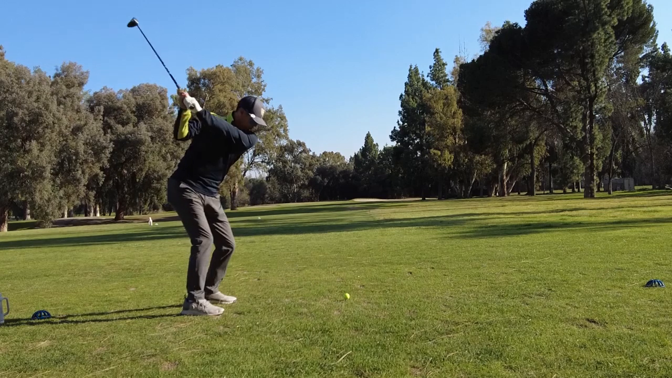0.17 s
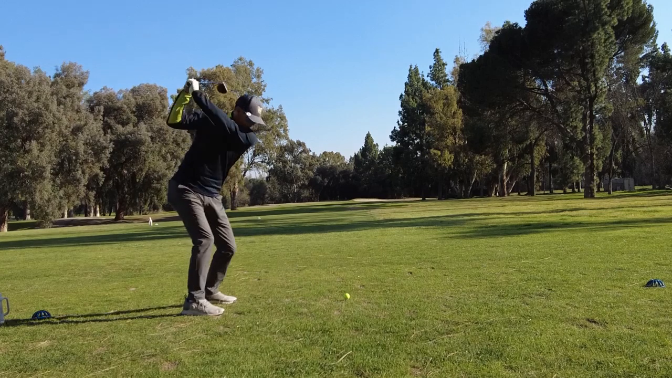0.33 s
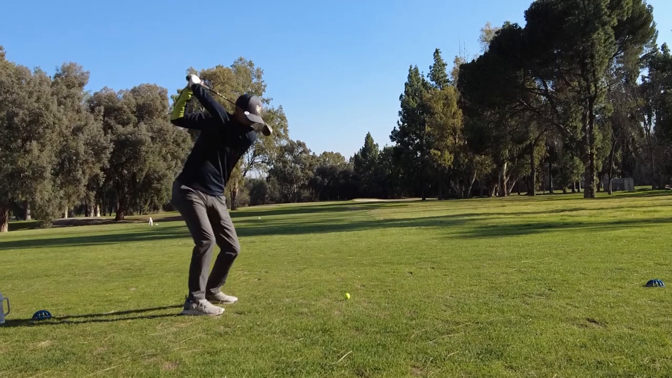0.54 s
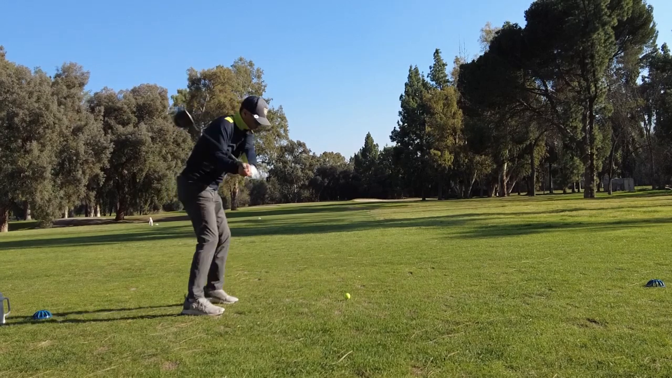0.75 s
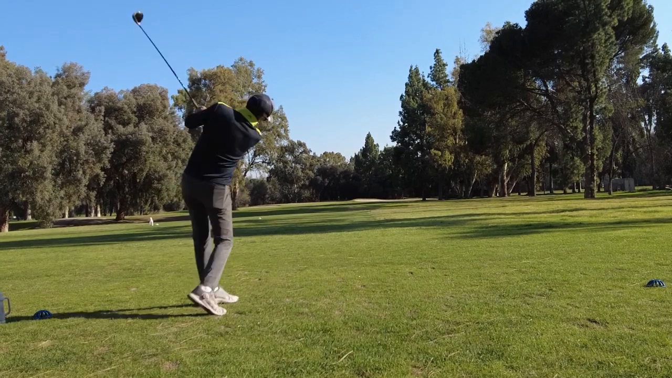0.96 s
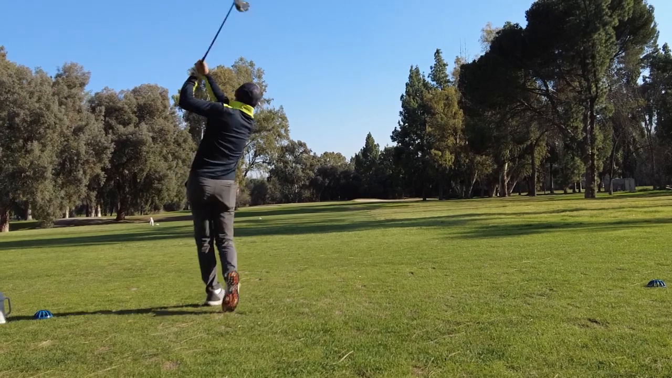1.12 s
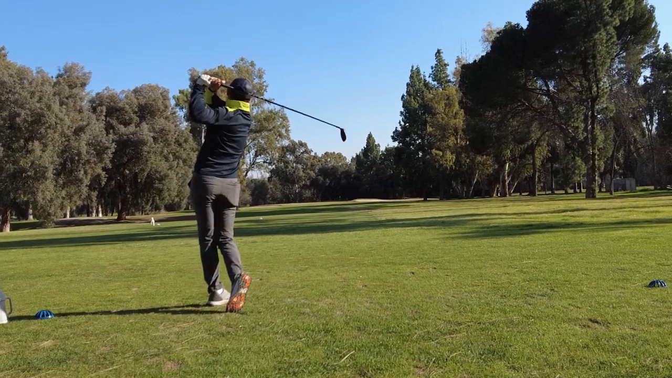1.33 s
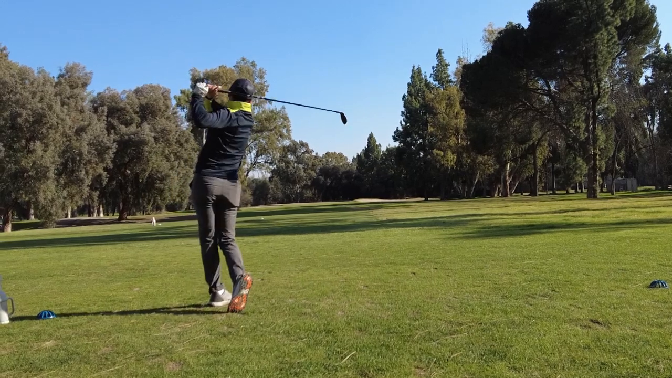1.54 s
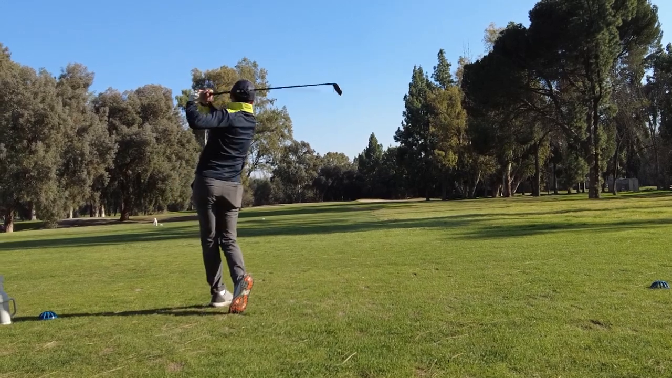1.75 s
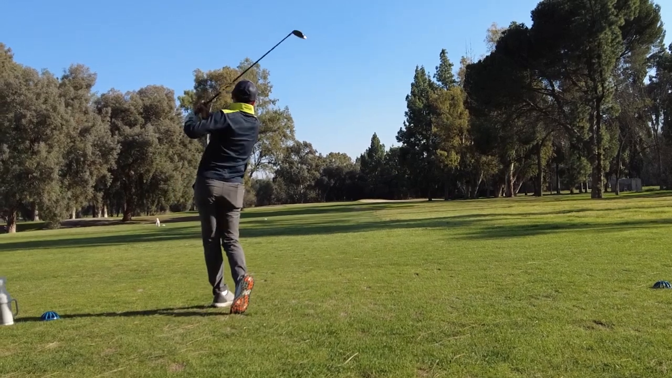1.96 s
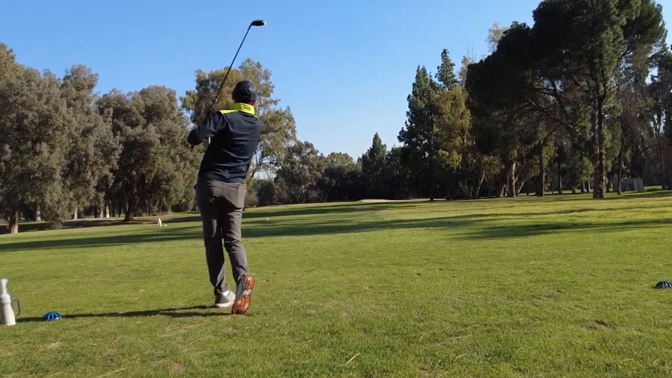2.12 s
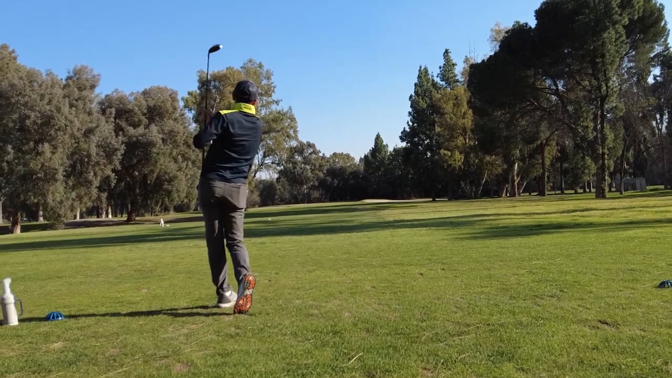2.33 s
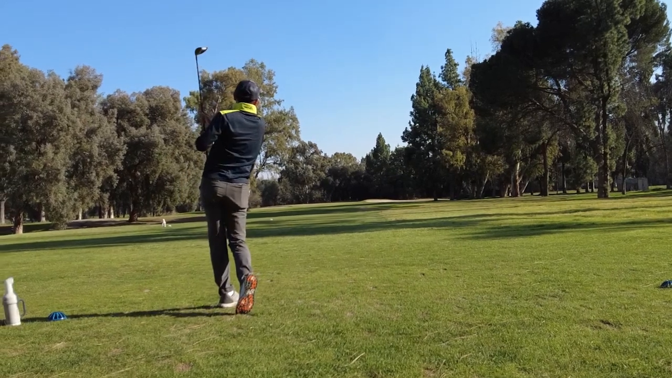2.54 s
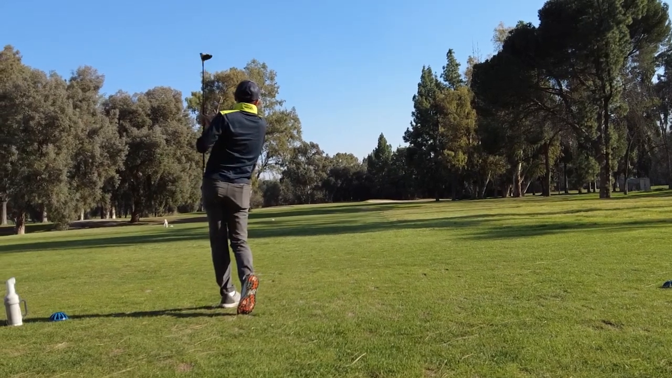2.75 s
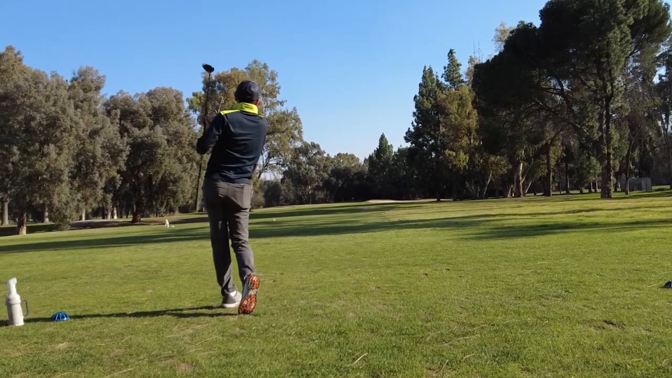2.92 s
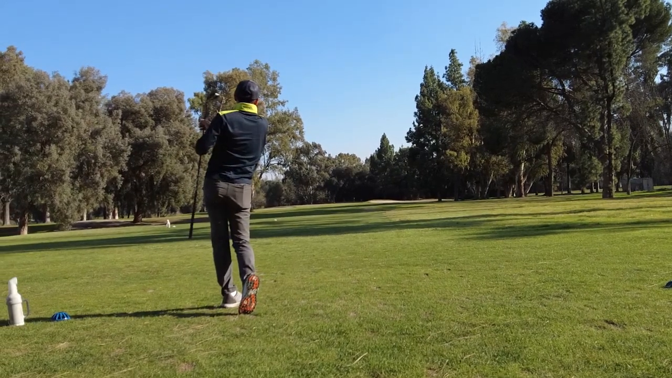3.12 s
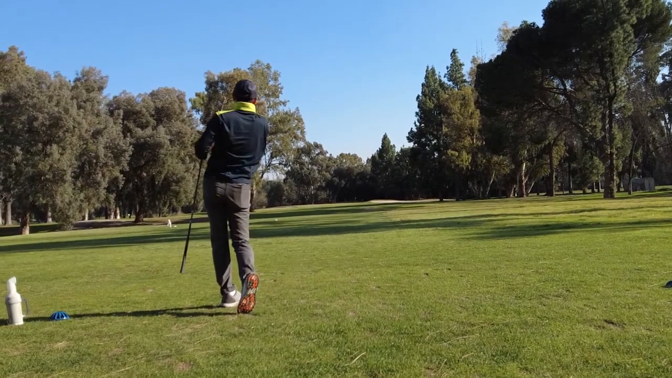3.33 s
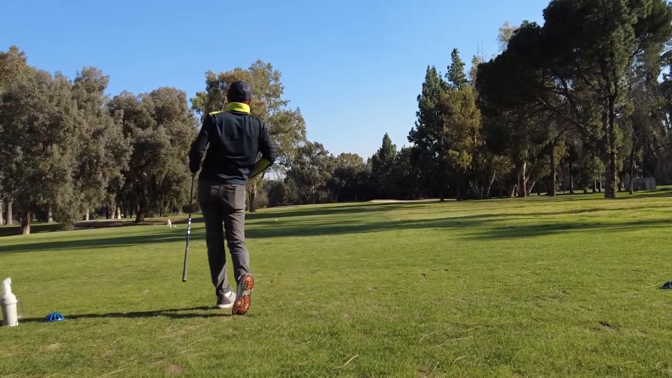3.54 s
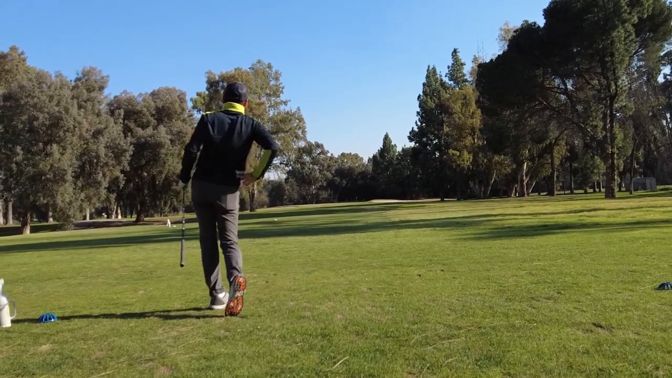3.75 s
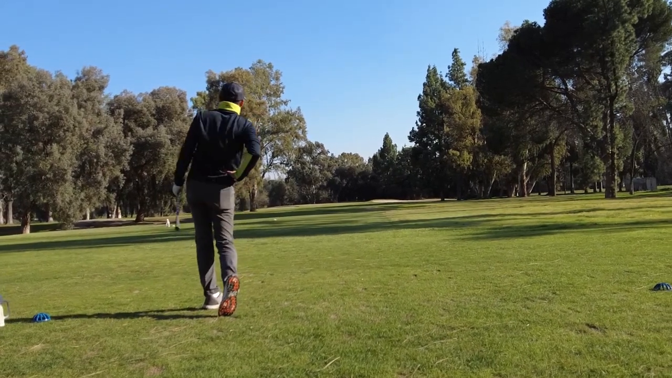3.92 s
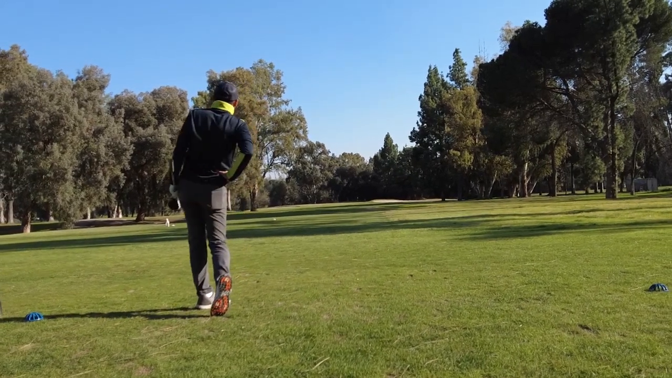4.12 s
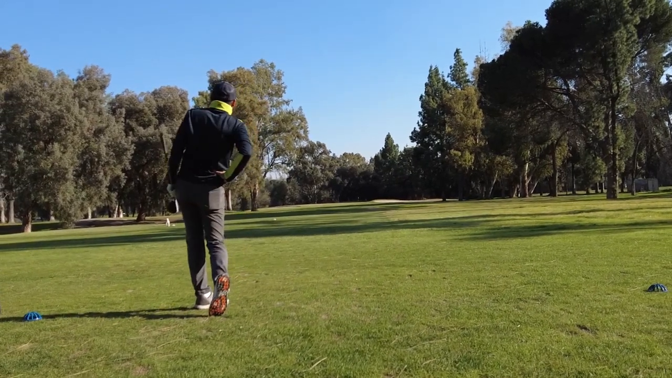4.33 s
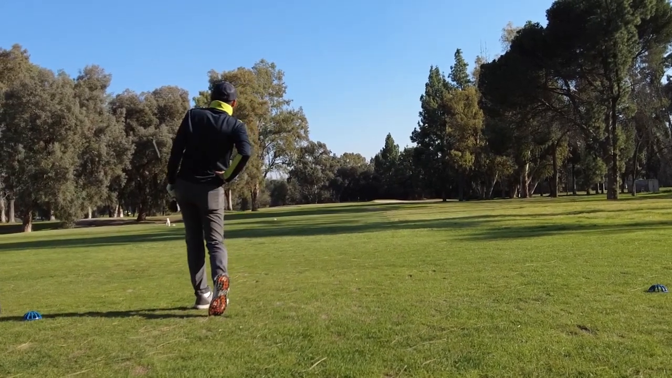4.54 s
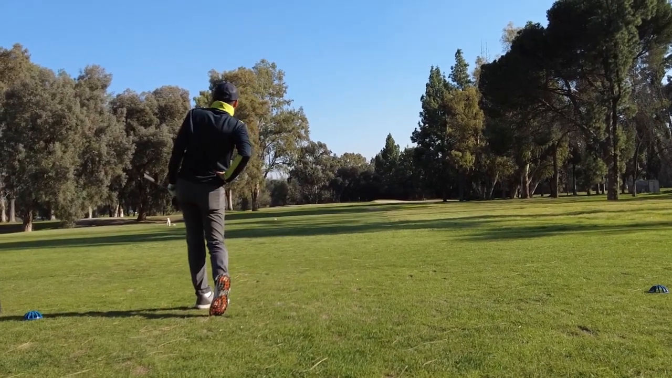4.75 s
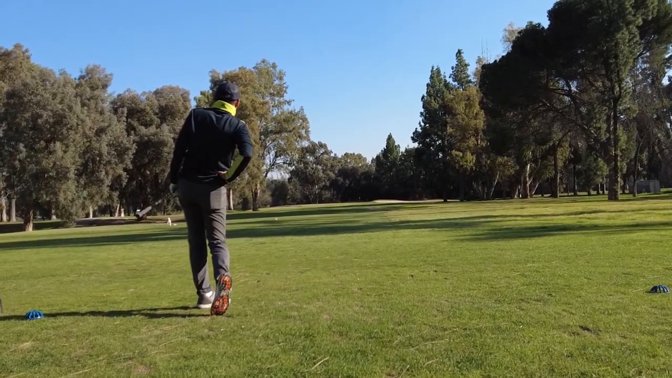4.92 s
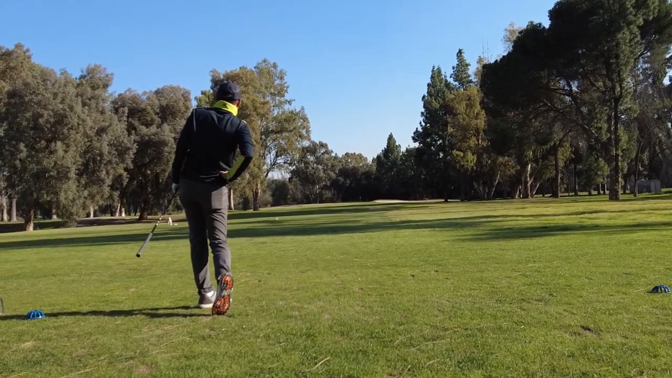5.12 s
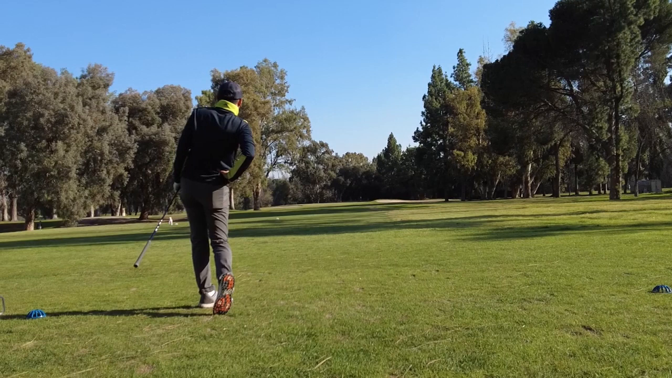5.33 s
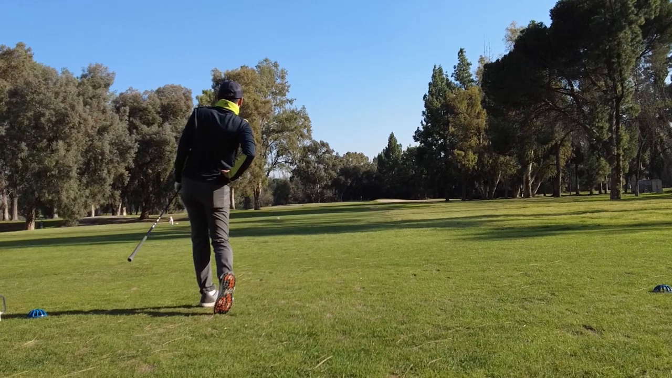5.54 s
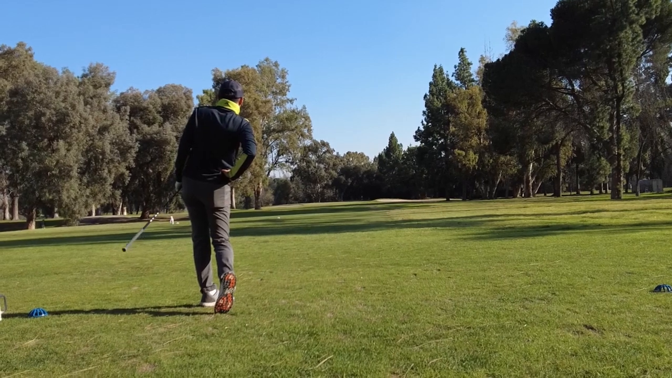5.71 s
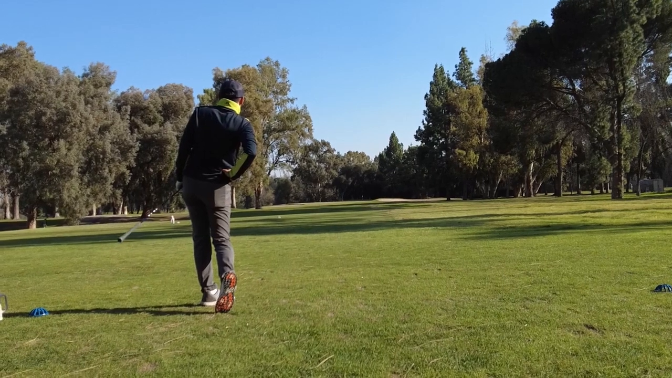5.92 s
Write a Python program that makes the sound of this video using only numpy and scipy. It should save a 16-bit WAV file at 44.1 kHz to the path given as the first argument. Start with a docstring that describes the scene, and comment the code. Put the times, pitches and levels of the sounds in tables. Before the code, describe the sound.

A quick airy swish and a sharp metallic golf drive crack, with a brief grainy tree echo, over steady distant traffic rumble and engine drones.

```python
"""A golf tee among trees: a golfer drives a ball while far traffic rumbles and two distant engines drone.
The shaft swishes as pitched noise, the hollow metal head cracks as a noise burst and rings as decaying modes,
and the turf and trees answer with washes of coloured noise. Afterwards come faint ticks of shoes and clothing,
the brush of a sleeve, a soft puff of wind, a few thin bird calls as gliding tones, a distant twitter
and one far knock."""
import sys
import numpy as np
from scipy import signal
from scipy.fft import rfft, irfft, next_fast_len
from scipy.io import wavfile
from scipy.ndimage import uniform_filter1d, map_coordinates

SR = 44100
rng = np.random.default_rng(int(sys.argv[2]) if len(sys.argv) > 2 else 0)


def file_out(sig):
    """Save sig as 16-bit WAV at sys.argv[1]."""
    # one column per channel
    cols = np.atleast_2d(sig).T
    # limit, then scale
    lim = np.clip(cols, -1, 1)
    pcm = np.round(lim * 32767).astype(np.int16)
    wavfile.write(sys.argv[1], SR, pcm)


N = 267863  # length in samples

IMPACT_S = 0.8984  # the head meets the ball
TOP_HZ = 15900  # the microphone passes nothing far above this
TYRE_SWELL_S, TYRE_SWELL_HALF_S = 3.17, 0.88  # the traffic's one swell: moment and half length
# How alike a sound from far off is at the two microphone ports.
# Each row: frequency in Hz, likeness from -1 (opposed) to 1 (identical).
LIKENESS = [(60, 0.97), (130, 0.92), (290, .75), (400, 0.65), (560, 0.27), (790, -0.3), (980, -0.13),
            (1150, -0.537), (1300, .78), (1650, 0.68), (2380, 0.38), (3440, .05), (7000, .45)]


def amp(db):
    """Decibels to a linear factor."""
    return 10 ** (np.asarray(db) / 20)


def unit(x):
    """x scaled to an rms of 1."""
    return x / np.sqrt(np.mean(x ** 2) + 1e-20)


def along(points, hz):
    """Values read off (Hz, value) points on a log frequency axis."""
    point_hz, values = np.transpose(points)
    return np.interp(np.log(hz + 1), np.log(point_hz + 1), values)


def curves(rows):
    """One value per sample for each column after the time in seconds."""
    s, *columns = np.transpose(rows)
    return [np.interp(np.arange(N) / SR, s, column) for column in columns]


def since(s):
    """Seconds since a moment, zero before it."""
    return np.maximum(np.arange(N) / SR - s, 0)


def bell(s, width_s):
    """A smooth swell of height 1 around a moment."""
    return np.exp(-((since(0) - s) / width_s) ** 2)


def burst(t, rise, t60):
    """An envelope that rises and dies away, falling 60 dB in t60 seconds."""
    return (1 - np.exp(-t / rise)) * amp(-60 * np.minimum(t / t60, 2 * np.pi))


def wobble(rate):
    """A smooth random curve, rate knots a second."""
    knots = rng.standard_normal(int(N * rate / SR) + 4)
    steps = np.linspace(0, N * rate / SR, 8 * len(knots))
    return np.interp(np.arange(N) * rate / SR, steps, map_coordinates(knots, [steps]))


def filtered(x, response):
    """x times a response of frequency, padded so that little wraps round."""
    m = next_fast_len(N + SR // 2)
    return irfft(rfft(x, m) * response(np.fft.rfftfreq(m, 1 / SR)), m)[..., :N]


def rush(spectrum, alike=LIKENESS):
    """Stereo noise of rms 1, coloured by (Hz, dB) points; the mid-side balance sets the ports' likeness."""
    def colour(hz):
        turn = np.arccos(np.clip(along(alike, hz), -1, 1)) / 2
        roll_off = 1 / (1 + (hz / spectrum[-1][0] / 2) ** 2)
        return amp(along(spectrum, hz)) * roll_off * np.array([np.cos(turn), np.sin(turn)])

    mid, side = filtered(rng.standard_normal((2, N)), colour)
    return unit(np.array([mid + side, mid - side]))


def patchy(x, depth_db, band_hz=180, span_s=.09):
    """Shifting air makes each band of a far sound come and go on its own."""
    z = signal.stft(x, nperseg=1024)[2]
    bins = max(round(band_hz * 1024 / SR), 1)
    frames = max(round(span_s * SR / 512), 1)
    field = uniform_filter1d(rng.standard_normal(z.shape[1:]), bins, 0)
    field = uniform_filter1d(field, frames, 1)
    return unit(signal.istft(z * amp(depth_db * unit(field)), nperseg=1024)[1][:, :N])


def ringing(modes, t):
    """Struck modes; neighbours swing in opposite directions, and a split mode beats against its twin."""
    out = np.zeros(N)
    live = (t > 0) & (t < .2)
    u = t[live]
    for k, (hz, db, t60, *split) in enumerate(modes):
        beat = np.cos(np.pi * split[0] * u) if split else 1
        out[live] += (-1) ** k * amp(db) * burst(u, .0001, t60) * beat * np.sin(2 * np.pi * hz * u)
    return out


def traffic(rumble_swing_db=.5, tyre_patches_db=1.57):
    """A far road: slightly swaying rumble and wavering tyres as shaped noise, under a faint hiss."""
    # Colours of the rumble, the tyres and the hiss. Each row: frequency in Hz, relative level in dB.
    rumble_colour = [(12, -22), (25, -2), (36, 2), (62, 2), (100, -6), (160, -9.5), (230, -16.5),
                     (330, -24), (480, -26), (750, -42.5)]
    tyre_colour = [(300, -15.5), (600, -2), (770, 1), (950, 1.5), (1130, -0.5), (1220, 0.5), (1350, -0.5),
                   (1900, -7.5), (2600, -17), (3400, -24.5), (6000, -54)]
    air_colour = [(1000, -2), (4000, 1.5), (6000, -4.5), (9500, -9.5), (12000, -20.5), (16000, -26.5)]
    rumble_db, start_db, air_db = -40.5, -54.5, -80
    thinning_db_per_s, swell_db = 0.24, 0.43  # the traffic slowly thins, with one mild swell
    rumble = amp(rumble_db + rumble_swing_db * wobble(3.4)) * rush(rumble_colour)
    swell = swell_db * bell(TYRE_SWELL_S, TYRE_SWELL_HALF_S)
    tyre_db = start_db - thinning_db_per_s * since(0) + swell
    tyres = amp(tyre_db) * patchy(rush(tyre_colour), tyre_patches_db)
    return rumble + tyres + amp(air_db) * rush(air_colour)


def tyre_whine(db=-68, swell_db=-65, flare_db=5.5):
    """A narrow band of the road noise flares in brief, wandering whistles, loudest as the traffic swells."""
    whine = rush([(700, -29.5), (850, -1.5), (970, 2), (1090, -3.5), (1230, -30.5)])
    level = amp(db) + amp(swell_db) * bell(TYRE_SWELL_S, TYRE_SWELL_HALF_S)
    return level * patchy(whine, flare_db, band_hz=90, span_s=.05)


def engine(pitch, hums, buzz, exhaust, count, firing_db, waver_db=0.54, drift_hz=.3, fade_db=2):
    """Count uneven cylinders: hums on low multiples of the firing rate, a buzz on multiples of the cycle."""
    turns = np.cumsum(pitch + drift_hz * wobble(3)) / SR  # firings so far
    tone = np.zeros(N)
    for k, hum in enumerate(hums, 1):
        tone += hum * amp(waver_db * wobble(4.3)) * np.sin(2 * np.pi * (k * turns + rng.random()))
    comb = np.zeros((2, N))
    # buzz lines lie between two and eight times the firing rate
    for k in range(2 * count + 1, 8 * count):
        hz = k * pitch.mean() / count
        db = along(exhaust, hz) + firing_db * (k % count == 0) + fade_db * wobble(4.005)
        # the likeness at each line sets how far out of step the two microphone ports hear it
        apart = np.arccos(np.clip(along(LIKENESS, hz), -1, 1)) * np.array([[1], [-1]]) / 2
        comb += amp(db) * np.sin(2 * np.pi * (k / count * turns + rng.random()) + apart)
    return np.sqrt(2) * tone + buzz * unit(comb)


def passing_engine():
    """The lower engine goes by: its firing hum falls as one over the distance, its buzz faster."""
    # What its exhaust lets through. Each row: frequency in Hz, relative level in dB.
    exhaust = [(200, 2), (253, -0.5), (276, -9), (298, -0.5), (322, -1.5), (345, 0.5), (368, -3.5),
               (415, -6.5), (460, -8.5), (510, -14.5), (550, -12), (595, -16), (645, -6.5), (690, -20),
               (730, -18)]
    # Its hum at twice the firing rate comes and goes with the air. Each row: time in seconds, level in dB.
    octave_hum = [(0, -61.5), (.6, -55.5), (1.3, -52), (1.8, -55.5), (2.35, -58.5), (2.8, -49.5),
                  (3.15, -52), (3.5, -47), (4.1, -53), (4.5, -63), (4.9, -50.5), (5.4, -57.5),
                  (6.05, -52.5)]
    nearest_s, pass_s = 3.5, 0.71  # nearest moment, and time to cover its own nearest distance from there
    hum_db, buzz_db = -42.5, -53.5  # when nearest
    buzz_fall = 1.9  # dB of buzz lost for each dB of hum
    firing_hz, sag_from_s, sag_hz_per_s = 91.75, 3.1, 1.05  # the pitch holds, then sinks
    nearness = 1 / np.hypot(1, (since(0) - nearest_s) / pass_s)
    pitch = firing_hz - sag_hz_per_s * since(sag_from_s)
    octave_db, = curves(octave_hum)
    hums = [amp(hum_db) * nearness, amp(octave_db)]
    buzz = amp(buzz_db) * nearness ** buzz_fall
    return engine(pitch, hums, buzz, exhaust, count=4, firing_db=5.5)


def droning_engine():
    """The higher engine's firing rate creeps up; its hum comes and goes, and its buzz swells three times."""
    # What its exhaust lets through. Each row: frequency in Hz, relative level in dB.
    exhaust = [(220, -8.5), (290, -7), (340, 1), (370, -7.5), (430, 1), (490, -8), (560, -8.5), (650, -16),
               (850, -24.5)]
    # Its hum at the firing rate. Each row: time in seconds, level in dB.
    firing_hum = [(0, -47.5), (.45, -58), (1.3, -47.5), (1.8, -45.5), (2.4, -47), (3.05, -45.5),
                  (3.55, -55.5), (4.1, -45), (4.5, -44), (5.25, -46.5), (5.7, -37), (6.05, -38.5)]
    # Swells of its buzz. Each row: middle in seconds, half length in seconds, level in dB.
    buzz_swells = [(2.55, 0.44, -59), (4.754, 0.24, -53.5), (5.983, 0.21, -50)]
    firing_hz, creep_hz_per_s, steady_buzz_db = 112.4, .2, -67.5
    hum_db, = curves(firing_hum)
    buzz = amp(steady_buzz_db) + sum(amp(db) * bell(s, half_s) for s, half_s, db in buzz_swells)
    pitch = firing_hz + creep_hz_per_s * since(0)
    return engine(pitch, [amp(hum_db)], buzz, exhaust, count=6, firing_db=5.5)


def gust(s=3.1, width_s=0.047, db=-35):
    """One soft puff of wind nudges the microphone: a swell of very low noise."""
    return amp(db) * bell(s, width_s) * rush([(15, -13), (36, 1.5), (55, -1), (110, -19.5)])


def twitter(s=5, width_s=0.62, db=-88, flicker_db=3.5):
    """Far birds twitter at the edge of hearing: a narrow band of flickering noise."""
    colour = [(3000, -40.5), (3900, -4.0), (4200, 1.5), (4550, -5.5), (5200, -42.0)]
    voices = rush(colour, [(1000, 0.0026)])
    return amp(db) * bell(s, width_s) * unit(amp(flicker_db * wobble(22))) * voices


def bird(fall_s=.012):
    """Thin calls that slide quickly to a pitch and level off, trembling slightly."""
    # Each row: start in seconds, length in seconds, level in dB, start pitch in Hz, end pitch in Hz.
    calls = [(4.53, 0.058, -81.5, 8200, 6750), (4.61, 0.046, -82, 4300, 4150),
             (5.08, 0.045, -83.5, 4150, 4300), (5.785, 0.036, -89, 9000, 9800),
             (5.85, 0.044, -81.5, 8300, 6750)]
    out = np.zeros(N)
    for s, length, db, start_hz, end_hz in calls:
        t = since(s)
        pitch = end_hz + (start_hz - end_hz) * np.exp(-t / fall_s) + 50 * wobble(300)
        swell = np.sqrt(np.abs(np.sin(np.pi * np.minimum(t / length, 1))))
        out += amp(db) * swell * np.sin(2 * np.pi * np.cumsum(pitch) / SR)
    return out


def far_knock(s=5.1845, ground_s=.0024, ground_db=-8, scatter_db=-47, scatter_t60=0.079):
    """One hard knock from across the course, doubled by the ground, dulled and scattered by distance."""
    # What the knock rings with. Each row: frequency in Hz, level in dB, time to fall 60 dB in seconds.
    knock_modes = [(720, -45, .02), (980, -39, 0.038), (1280, -33.5, 0.0064), (1430, -35.5, 0.022),
                   (1780, -46, 0.02), (2590, -48, .012), (2900, -43, 0.008), (3240, -51.5, .012),
                   (4420, -54, .007), (6200, -63, .006), (7300, -71, .014)]
    scatter_colour = [(300, -13), (900, 6), (1600, 2), (2200, -10), (2900, -9), (3600, -18),
                      (4500, -18), (5300, -28), (7200, -27), (12000, -51)]
    t = since(s)
    knock = ringing(knock_modes, t) + amp(ground_db) * ringing(knock_modes, since(s + ground_s))
    return knock + amp(scatter_db) * burst(t, 0.0016, scatter_t60) * rush(scatter_colour)


def sleeve(s=3.96, width_s=0.22, db=-83):
    """Cloth brushes softly as a hand goes to the hip: a swell of unsteady high noise."""
    cloth = rush([(2000, -11.5), (5000, 2.0), (10000, -3.5), (15000, -2.5)])
    return amp(db + 2 * wobble(40)) * bell(s, width_s) * cloth


def ticks(t60=.014):
    """Tiny dry snaps of shoes and clothing as the golfer holds the finish and relaxes."""
    # Each row: start in seconds, level in dB, centre in Hz, width as a natural log of frequency ratio.
    snaps = [(1.248, -63.5, 10160, .6), (1.304, -73, 9000, .5), (1.826, -72, 5480, .25),
             (2.129, -73.5, 8000, 0.54), (2.205, -71.5, 7500, .6), (2.225, -65, 7960, .6),
             (2.411, -69.5, 6960, .7), (2.449, -61, 3300, .3), (2.469, -66, 5940, 0.46),
             (2.797, -72, 8500, .3), (4.204, -66.5, 5010, .45), (4.308, -66, 4600, .5)]
    out = np.zeros(N + SR)
    t = np.arange(SR // 10) / SR
    hz = np.fft.rfftfreq(len(t), 1 / SR)
    for s, db, centre, width in snaps:
        band = np.exp(-(np.log((hz + 1) / centre) / width) ** 2)
        snap = irfft(rfft(rng.standard_normal(len(t))) * band, len(t))
        out[round(s * SR):][:len(t)] += amp(db) * burst(t, .0003, t60) * unit(snap)
    return out[:N]


def far_trees(delay_s=0.32, width_s=0.15, db=-72.0, flutter_db=0.25):
    """The trees down the fairway send back one late, soft echo."""
    # Colour of the echo. Each row: frequency in Hz, relative level in dB.
    echo_colour = [(1500, -4), (3200, -4.5), (4200, 3.5), (4700, -5), (5400, 0.5), (6500, -9),
                   (12000, -13.5)]
    level = amp(db + flutter_db * wobble(50)) * bell(IMPACT_S + delay_s, width_s)
    return level * rush(echo_colour, [(1000, 0.48)])


def trees(patches_db=3.0, grain_db=1.5, left_db=-0.1):
    """Turf and crowns scatter the crack into a grainy wash that returns in overlapping waves."""
    # Waves from the near turf to the trees around the tee.
    # Each row: delay in seconds, level in dB, rise in seconds, time to fall 60 dB in seconds.
    waves = [(.003, -46.5, .003, .09), (.036, -43.5, 0.026, 0.2173), (0.089, -49, 0.012, 0.43)]
    # Colour of the wash. Each row: frequency in Hz, relative level in dB.
    foliage_colour = [(100, -31.5), (800, -11.5), (1450, 1), (2300, -6.5), (2700, -2), (3250, -12),
                      (3780, 2.5), (4300, -6.5), (4820, 7.5), (5300, 0), (6250, -5), (6600, -.5),
                      (6950, -11.5), (7550, -10), (8400, -14), (9200, -11.5), (11300, -18), (15500, -17.5)]
    power = sum((amp(db) * burst(since(IMPACT_S + delay), rise, t60)) ** 2 for delay, db, rise, t60 in waves)
    grains = unit(amp(grain_db * np.array([wobble(260), wobble(290)])))
    wash = patchy(rush(foliage_colour, [(1000, .25)]), patches_db, band_hz=353, span_s=.025)
    return np.sqrt(power) * grains * wash * amp([[left_db], [-left_db]])


def trunks(delay_s=0.065, width_s=.016, db=-50, grain_db=1.5):
    """The nearest trunks throw back one quick, ragged reflection that keeps more of the crack's middle."""
    # Colour of the reflection. Each row: frequency in Hz, relative level in dB.
    trunk_colour = [(500, -10), (1000, -3), (1600, 4.5), (2700, -2), (3250, -8.5), (3800, -3), (4300, -5),
                    (4850, 3.5), (5600, -2.5), (6600, -3), (7500, -10), (10000, -14.5), (15500, -19.5)]
    grains = unit(amp(grain_db * wobble(400)))
    return amp(db) * bell(IMPACT_S + delay_s, width_s) * grains * rush(trunk_colour, [(1000, .5)])


def swish():
    """The shaft sheds vortices whose pitch climbs as it sweeps past; the head trails it, hissing to the ball."""
    # Air torn by the club. Each row: frequency in Hz, relative level in dB.
    hiss_colour = [(300, -7.5), (1200, 1), (2500, -11.5), (5000, -14.5), (9000, -19.5), (15000, -22.5)]
    swish_s, build_s, fade_s = .839, .027, .042  # loudest moment, build and fade
    pitch_hz, width_hz, whistle_db = 610, 340, -48.7  # pitch at the loudest moment, half width, level
    climb_hz_per_s = 10500
    hiss_s, hiss_half_s, hiss_db = .856, .046, -54  # peak, half length, level
    sweep = bell(swish_s, np.where(since(0) < swish_s, build_s, fade_s))
    pitch = np.clip(pitch_hz + climb_hz_per_s * (since(0) - swish_s), 0, TOP_HZ)
    phase = 2 * np.pi * np.cumsum(pitch) / SR
    # slow noise carried on the climbing pitch makes a breathy whistle
    eddies = unit(filtered(rng.standard_normal((2, N)), lambda hz: np.exp(-(hz / width_hz) ** 2)))
    whistle = eddies[0] * np.sin(phase) + eddies[1] * np.cos(phase)
    hiss = amp(hiss_db) * bell(hiss_s, hiss_half_s) * rush(hiss_colour, [(1000, .8)])
    return amp(whistle_db) * sweep * whistle + hiss


def thump(t, push_db=-10.5, push_s=0.00028, wake_db=-23, wake_s=.0016):
    """The flattened ball pushes the air aside; a slower wake follows as it leaves."""
    def pulse(peak_s):
        return t / peak_s * np.exp(-t / peak_s)  # peaks at 1/e

    return amp(push_db) * pulse(push_s) + amp(wake_db) * pulse(wake_s)


def strike(crack_db=-18, crack_t60=.0035, sizzle_t60=0.034, ring_db=0.04, flutter_from_s=.006,
           damping_db_per_s=130):
    """Head meets ball: a push of air, a crack, and beating modes of the head that roughen as they die."""
    # The hollow club head and the ball. Each row: frequency in Hz, relative level in dB,
    # time to fall 60 dB in seconds before the shared damping, split of a close pair in Hz.
    head_modes = [(854, -27.0, 0.0208, 0), (1365, -14.5, 0.0083, 0), (1832, -26.1, 0.0057, 0),
                  (2009, -8.1, 0.0036, 0), (2607, -29.1, 0.0184, 0), (2861, -21.4, 0.0055, 0),
                  (3640, -28.0, 0.0364, 81), (3850, -41.5, 0.1265, 94), (4635, -19.7, 0.0219, 0),
                  (5256, 2.0, 0.0013, 0), (5528, -13.6, 0.0048, 0), (6213, -41.9, 0.0716, 0),
                  (6527, -18.4, 0.0304, 187), (6813, -43.0, 0.0658, 0), (7534, -37.0, 0.0901, 0),
                  (7938, -11.0, 0.0049, 0), (8064, -45.9, 0.0624, 0), (8577, -14.2, 0.0099, 0),
                  (9034, -24.0, 0.0344, 99), (9443, -23.6, 0.0258, 111), (10158, -26.6, 0.0311, 0),
                  (10461, -16.2, 0.0127, 0), (11164, -29.9, 0.0194, 0), (12475, -17.9, 0.0114, 0),
                  (13646, -23.1, 0.0183, 150), (14688, -12.7, 0.0098, 205), (15442, -28.6, 0.0167, 0)]
    # Colour of the crack. Each row: frequency in Hz, relative level in dB.
    crack_colour = [(600, 5.5), (2000, 1), (3200, -2), (5000, 3), (5800, -5), (8500, 1.5), (11000, 0.5),
                    (15000, 0)]
    flutter_db, flutter_per_s, sizzle_db = 3, 450, -34
    t = since(IMPACT_S)
    crack = amp(crack_db) * burst(t, .0001, crack_t60)
    # the many weak modes of the thin shell blur into a short sizzle
    sizzle = amp(sizzle_db) * burst(t, 0.000628, sizzle_t60)
    blast = (crack + sizzle) * rush(crack_colour, [(1000, .2)])
    # the flutter grows to full depth over the first milliseconds
    flutter = amp(flutter_db * wobble(flutter_per_s) * np.minimum(t / flutter_from_s, 1))
    ring = amp(ring_db - damping_db_per_s * t) * flutter * ringing(head_modes, t)
    return ring + blast - thump(t)


def scene():
    """The drive and its echoes over the sounds of the course, which lean slightly to the right."""
    course = traffic() + tyre_whine() + passing_engine() + droning_engine() + gust()
    course = course * amp([[-.3], [.3]])
    birds = twitter() + bird()
    golfer = sleeve() + ticks()
    echoes = far_trees() + trees() + trunks()
    return course + birds + far_knock() + golfer + echoes + swish() + strike()


def record(dry, lag_s=.000014):
    """Sound reaches the microphone's right port a moment before the left; the top is cut at the band limit."""
    eased = dry * np.minimum(since(0) / .003, 1)  # a short fade in
    ports = filtered(eased, lambda hz: np.exp(1j * np.pi * hz * lag_s * np.array([[-1], [1]])))
    return filtered(ports, lambda hz: np.clip((TOP_HZ - hz) / 400 + .5, 0, 1))


dry = scene()
out = record(dry)
file_out(out)
```